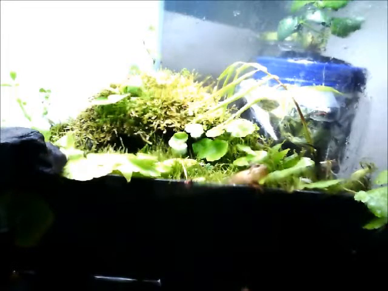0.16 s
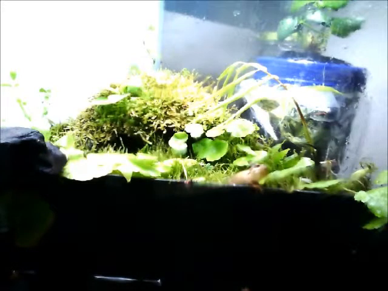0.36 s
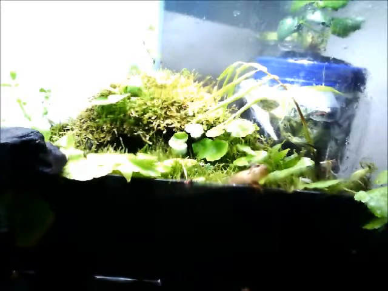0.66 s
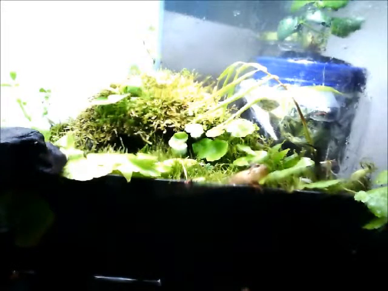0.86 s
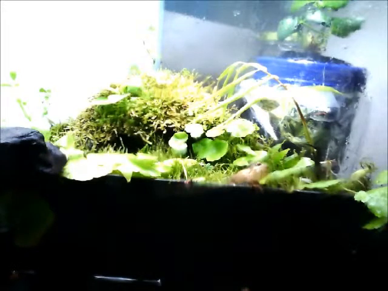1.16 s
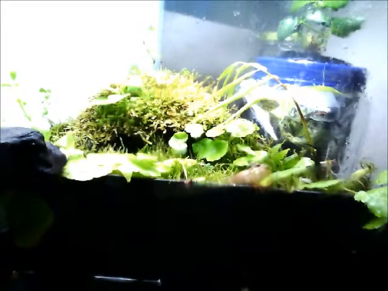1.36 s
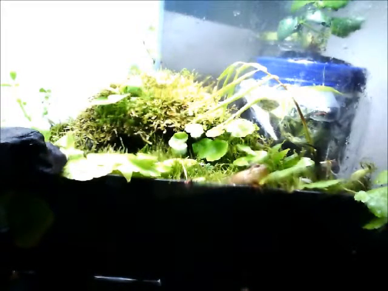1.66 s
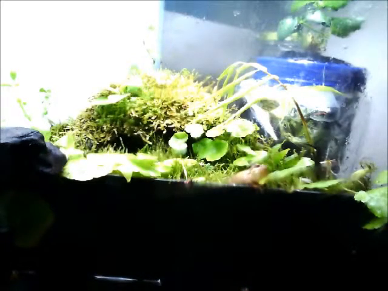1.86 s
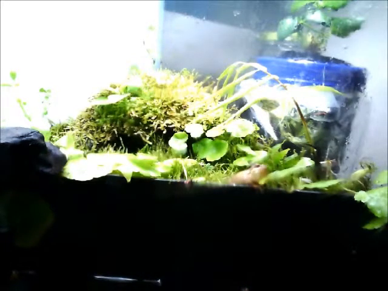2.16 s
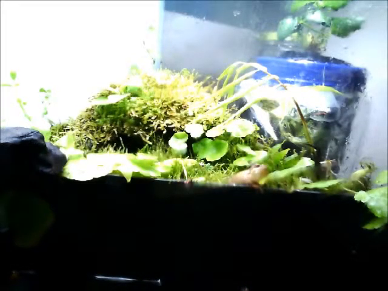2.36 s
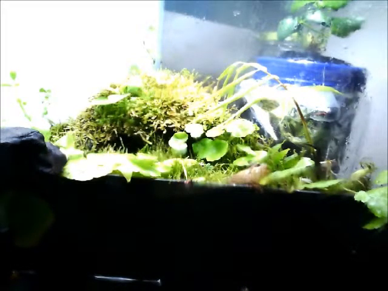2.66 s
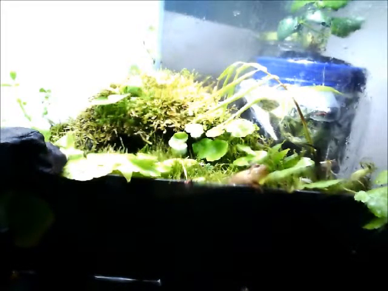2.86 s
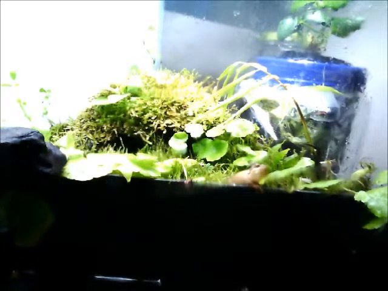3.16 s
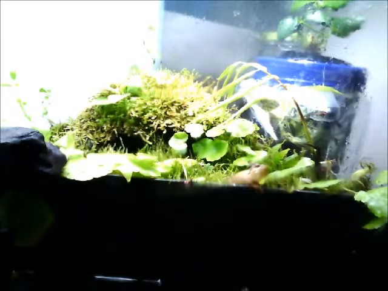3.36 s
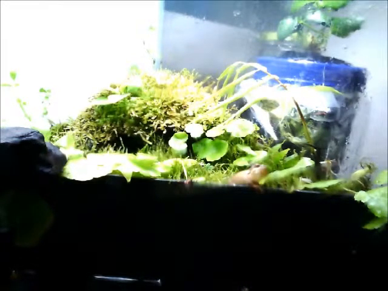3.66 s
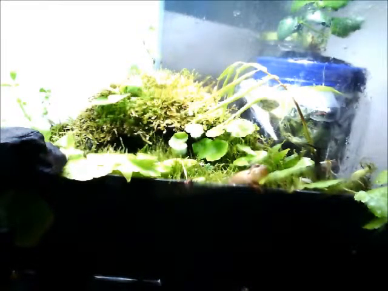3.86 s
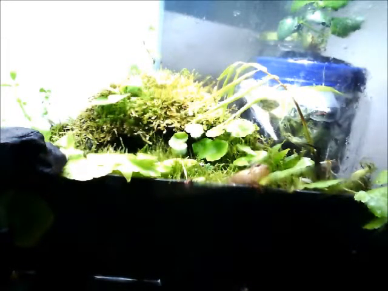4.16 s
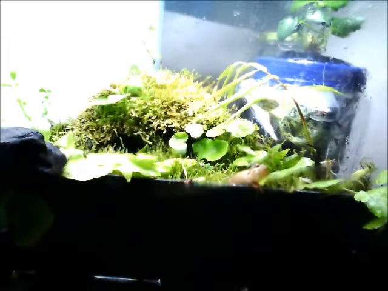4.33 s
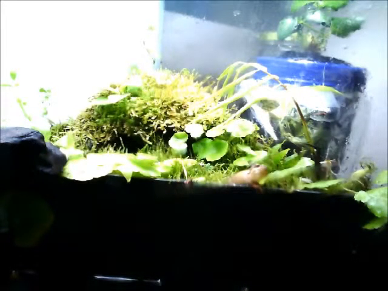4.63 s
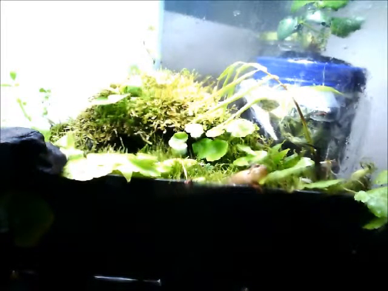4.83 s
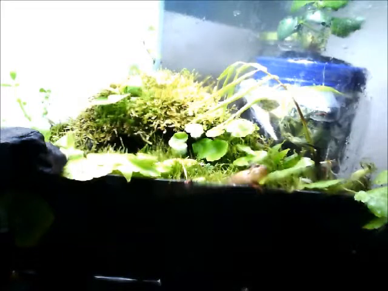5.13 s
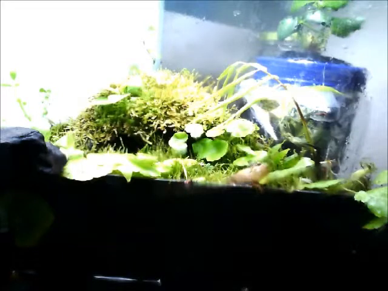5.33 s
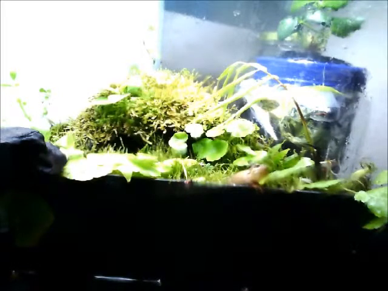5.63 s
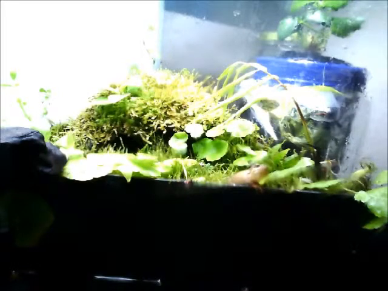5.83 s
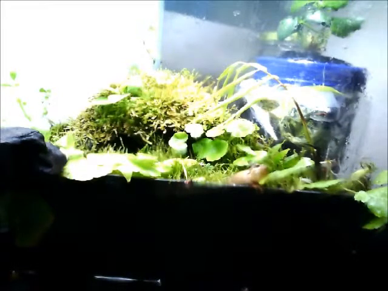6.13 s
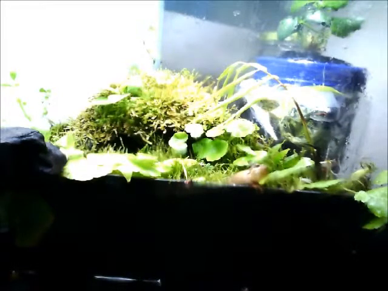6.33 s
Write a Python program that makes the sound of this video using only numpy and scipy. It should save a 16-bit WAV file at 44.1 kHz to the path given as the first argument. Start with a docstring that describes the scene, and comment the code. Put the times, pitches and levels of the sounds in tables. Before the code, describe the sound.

Indoors, a low mains and pump drone with soft hiss, while a tiny frog makes brisk creaky double calls that ring off glass.

```python
"""In a glass terrarium a small tree frog calls: most calls pair a swelling note with a harder one.
Each note is a quick train of pulses; every pulse excites a broad throat rasp and a round pip of the vocal sac.
The glass walls scatter the sound, standing waves ring in the tank and the room adds a short tail.
A pump and mains hum drone nearby as sums of sines, over rumble and soft hiss of filtered noise.
A few tiny drips are bursts of narrow-band noise, and dry clicks are single short impulses."""
import sys
import numpy as np
from scipy import signal
from scipy.fft import rfft, irfft, next_fast_len
from scipy.io import wavfile

SR = 44100
rng = np.random.default_rng(int(sys.argv[2]) if len(sys.argv) > 2 else 0)


def generate_wav(signal):
    """Clip the signal to [-1, 1] and save it as 16-bit WAV at the path in sys.argv[1]."""
    frames = np.transpose(np.atleast_2d(signal))
    scaled = np.clip(frames, -1, 1) * 32767
    pcm = np.round(scaled).astype(np.int16)
    wavfile.write(sys.argv[1], SR, pcm)


N = 286209

# Notes of the frog; an early crest is a hard start. Each row: start in seconds, length in seconds,
# crest in seconds after the start, pulse rate in pulses per second, rasp at the crest in relative dB,
# sac pip at the crest in relative dB, sac frequency at the crest in Hz.
FROG_NOTES = [ (-.047, .04, .03, 170, -9.5, -12, 3470), (1.161, .045, 0.034, 150, -8, -8, 3100),
              (1.2271, .036, 0, 150, -5, -6.5, 3260), (1.269, .062, .03, 166, -11, -15, 3540),
              (1.335, .067, 0.004, 150, -12, -15, 3520), (1.513, .032, 0, 166, -21.5, -33, 3160),
              (2.5955, .035, 0.012, 140, -7, -4.5, 3250), (2.672, .036, 0, 149, -5, -6.5, 3360),
              (4.1286, .036, 0.023, 148, -8.5, -8.5, 3130), (4.1977, .046, 0.0052, 157, -4, -6, 3385),
              (5.297, .049, 0.022, 147, -8.5, -8, 3220), (5.3698, .046, 0.0029, 141, -2, -4, 3410),
              (6.485, .04, .03, 190, -11, -7.5, 3350)]
# Spectrum of the rasp of one pulse. Each row: frequency in Hz, level in relative dB.
THROAT_SPECTRUM = [(700, -45.5), (1150, -18), (1400, -1.5), (1900, 0.5), (2300, -5), (2650, 5.5), (3350, 6),
                   (3950, -2.5), (4500, -4.5), (4950, -15.5), (6300, -13.5), (8000, -19), (9100, -19.5),
                   (10800, -47)]
# Standing waves between the glass walls. Each row: frequency in Hz, level in relative dB.
TANK_MODES = [(1377, 1), (1475, 1.5), (1615, -0.5), (1674, 7), (2160, -11), (2589, -0.5), (2850, -20),
              (2988, -5), (3085, -17), (3165, -7), (3233, -1.5), (3305, -21), (3374, 7.5), (3470, -3),
              (3662, -2.5), (3805, -4.5), (4293, 4.5), (4440, 1.5), (5776, -1), (6002, 8), (8400, 4)]
# Decay of the scatter from the glass. Each row: frequency in Hz, time to fall 60 dB in seconds.
GLASS_DECAY = [(1500, 0.14), (3200, 0.1), (6000, 0.33), (10000, 0.13)]
# Decay of the room tail. Each row: frequency in Hz, time to fall 60 dB in seconds.
ROOM_DECAY = [(1500, 0.62), (3500, 0.44), (6000, 0.95), (10000, 0.31)]
# Drips. Each row: start in seconds, level before the envelope in dB, centre in Hz,
# half-width at half amplitude in Hz.
DRIP_EVENTS = [(.222, -42, 5270, 450), (.815, -60, 11900, 400), (1.872, -48.5, 8800, 750),
               (2.438, -51.5, 9100, 500), (3.232, -52, 3480, 250), (4.745, -35.5, 5550, 850),
               (6.195, -54, 5030, 600), (6.24, -48, 6200, 890)]
# Dry clicks. Each row: start in seconds, gain on the click spectrum in dB.
CLICK_EVENTS = [(1.6534, -7), (2.774, -25), (3.187, -13.5), (3.883, -12)]
# Spectrum of one click before its gain. Each row: frequency in Hz, level in dB.
CLICK_SPECTRUM = [(200, 4), (1200, 9), (3000, -5), (8000, -8.5), (15000, -19)]
# Mains hum and its harmonics. Each row: frequency in Hz, level in dB rms.
MAINS_TONES = [(59.95, -32.5), (120, -43.5), (180, -46), (239.9, -53), (300, -57.5), (359.9, -53.5)]
# Tones of the pump. Each row: frequency in Hz, level in dB rms.
PUMP_TONES = [(15.7, -52), (31.4, -36.3), (78.4, -51), (93.1, -49.5), (182.7, -44)]
# Shape of the pump's rumble. Each row: frequency in Hz, density in relative dB.
RUMBLE_SPECTRUM = [(10, -5), (25, 0), (45, 3), (75, -1), (105, -7), (140, -5), (185, -6), (207, -15.5),
                   (255, -7), (330, -12), (450, -14), (700, -31)]
# Shape of the hiss. Each row: frequency in Hz, density in relative dB.
HISS_SPECTRUM = [(240, -11.5), (400, -6.5), (475, -2), (565, -6.5), (616, -4.5), (846, -5.5), (1110, -8),
                 (1340, -12), (1740, -11), (2460, -19.5), (6170, -21), (8350, -27), (11800, -34.5),
                 (12500, -33.5), (16200, -63), (22000, -120)]

HISS_TOP_HZ, TOP_HZ = 12400, 15900  # upper limits of the hiss and of the whole sound
LEAD = SR // 4  # samples of sound before time zero
RASP_SWELL_DB, PIP_SWELL_DB = 3, 17  # rise to the crest; less if the crest comes very early
RASP_SAG_DB_PER_S, PIP_SAG_DB_PER_S = 47, 149  # fall after the crest, as the breath runs out
TREBLE_DB, TREBLE_PER_HARSH_DB = -2.5, 0.8  # the further the rasp outweighs the pip, the more treble
EDGE_HZ, EDGE_HZ_PER_DB = 9140, 131  # top edge of a rasp at 0 dB; softer notes are duller
SAC_HZ_PER_DB, SAC_SCATTER_HZ = 18.5, 70  # pitch rises with effort and varies from pulse to pulse
LOW_DB, LOW_PER_DB = 4, 0.36  # low throat resonance of a rasp at 0 dB; it fades in softer notes


def frog(sac_echo_db=-4.5, level_db=12):
    """Source and enclosure: the pips sound directly and scattered, the rasps only scattered by the tank."""
    track, walls = np.zeros(LEAD + N), terrarium()
    for start, length, crest, rate, rasp_db, pip_db, sac_hz in FROG_NOTES:
        at, size_db = larynx(length, rate)
        rasp_effort_db = size_db + effort(at / SR, crest, RASP_SWELL_DB, RASP_SAG_DB_PER_S)
        pip_effort_db = size_db + effort(at / SR, crest, PIP_SWELL_DB, PIP_SAG_DB_PER_S)
        pulses = np.bincount(at, amp(rasp_db + rasp_effort_db))
        rasps = signal.fftconvolve(pulses, throat(rasp_db, pip_db))
        pips = amp(pip_db) * sac(at, pip_effort_db, sac_hz)
        add(track, start, pips)
        add(track, start, signal.fftconvolve(rasps + amp(sac_echo_db) * pips, walls))
    return amp(level_db) * track[LEAD:]


def larynx(length, rate, jitter=.045, scatter_db=0.56):
    """Quasi-periodic excitation: sample positions and sizes (dB) of the slightly uneven pulses of a note."""
    chance = rng.standard_normal((64, 2))[:int(length * rate) + 1]
    # jitter is a fraction of the pulse period
    times = np.abs(np.arange(len(chance)) + jitter * chance[:, 0]) / rate
    return np.round(times * SR).astype(int), scatter_db * chance[:, 1]


def effort(t, crest, swell_db, sag_db_per_s, quickest_s=.012):
    """Exponential growth and decay: the level (dB) rises evenly to 0 at the crest, then sags steadily."""
    swell = swell_db * (t - crest) / max(crest, quickest_s)
    sag = sag_db_per_s * (crest - t)
    return np.where(t < crest, swell, sag)


def throat(rasp_db, pip_db, low_hz=1550, low_width_hz=220, treble_hz=6200, treble_width_hz=1100):
    """Source-filter principle: the rasp of one pulse, with energy 1, is coloured by how hard the note is."""
    low_db = LOW_DB + LOW_PER_DB * rasp_db
    treble_db = TREBLE_DB + TREBLE_PER_HARSH_DB * (rasp_db - pip_db)
    edge_hz = EDGE_HZ + EDGE_HZ_PER_DB * rasp_db

    def bump(hz, centre, width):
        return np.exp(-((hz - centre) / width) ** 2 / 2)

    def colour(hz):
        low = low_db * bump(hz, low_hz, low_width_hz)
        treble = treble_db * bump(hz, treble_hz, treble_width_hz)
        edge = -10 * np.log10(1.5 + (hz / edge_hz) ** 20)
        return along(THROAT_SPECTRUM, hz) + low + treble + edge

    rasp = impulse(colour)[:SR // 50]
    return rasp / np.linalg.norm(rasp)


def sac(at, effort_db, sac_hz, swell=0.00064):
    """Damped resonance: at each pulse the sac takes a few cycles to swell and a few to die."""
    t = np.arange(SR // 50) / SR
    scatter_hz = SAC_SCATTER_HZ * rng.standard_normal(size=64)[:len(at)]
    hz = sac_hz + SAC_HZ_PER_DB * effort_db + scatter_hz
    pips = t ** 2 * np.exp(-t / swell) * np.sin(2 * np.pi * hz[:, None] * t)
    pips *= (amp(effort_db) / np.linalg.norm(pips, axis=1))[:, None]
    # overlapping pips add where their samples coincide
    positions = at[:, None] + np.arange(len(t))
    return np.bincount(positions.ravel(), pips.ravel())


def terrarium(modes_db=-14, modes_t60=0.12, room_db=-11):
    """Impulse response of an enclosure: quick scatter, standing waves in the tank, then the room."""
    t = np.arange(SR // 3) / SR
    modes = sum(amp(db) * np.sin(2 * np.pi * (hz * t + rng.random())) for hz, db in TANK_MODES)
    modes *= amp(-60 * t / modes_t60)
    answer = tail(GLASS_DECAY, onset=0.00073) + amp(room_db) * tail(ROOM_DECAY, onset=0.0042)
    answer[:len(t)] += amp(modes_db) * modes / np.linalg.norm(modes)
    return answer


def tail(decay, onset):
    """Diffuse reverberation: noise echoes scaled to energy 1, each frequency dying at its own speed."""
    hz, t, z = signal.stft(rng.standard_normal(SR // 2), SR, nperseg=256)
    t60 = along(decay, hz)[:, None]
    echoes = signal.istft(z * amp(-60 * t / t60), SR, nperseg=256)[1]
    echoes *= 1 - np.exp(-np.arange(len(echoes)) / SR / onset)
    return echoes[:SR // 2] / np.linalg.norm(echoes)


def drips(t60=0.21, attack=0.0038):
    """Narrow-band decay: tiny high plinks of resonant noise, each with a quick attack and a steady fade."""
    track, t = np.zeros(LEAD + N), np.arange(SR // 3) / SR
    for start, db, centre_hz, width_hz in DRIP_EVENTS:
        noise = rng.standard_normal(len(t))
        ring = unit(filtered(noise, lambda hz: 1 / (1 + ((hz - centre_hz) / width_hz) ** 2)))
        add(track, start, ring * amp(db - 60 * t / t60) * (1 - np.exp(-t / attack)))
    return track[LEAD:]


def clicks():
    """Impulsive excitation: single short coloured impulses with no echo."""
    track, click = np.zeros(LEAD + N), impulse(lambda hz: along(CLICK_SPECTRUM, hz))
    for start, db in CLICK_EVENTS:
        add(track, start, amp(db) * click)
    return track[LEAD:]


def hum():
    """Superposition: steady mains and pump tones add, and two close ones beat against each other."""
    t = np.arange(N) / SR
    tones = MAINS_TONES + PUMP_TONES
    # the root of two turns an rms level into a sine's peak
    return sum(np.sqrt(2) * amp(db) * np.sin(2 * np.pi * (hz * t + rng.random())) for hz, db in tones)


def air(rumble_db=-36, hiss_db=-45.0):
    """Stationary random noise: filtering shapes the pump's low rumble and an even hiss, levels in dB rms."""
    def rumble_response(hz):
        rolloff_db = 71 * np.log10(1 + (hz / 1500) ** 2)
        return amp(along(RUMBLE_SPECTRUM, hz) - rolloff_db)

    def hiss_response(hz):
        return amp(along(HISS_SPECTRUM, hz)) * (hz < HISS_TOP_HZ)

    rumble = filtered(rng.standard_normal(N), rumble_response)
    hiss = filtered(rng.standard_normal(N), hiss_response)
    return amp(rumble_db) * unit(rumble) + amp(hiss_db) * unit(hiss)


def amp(db):
    """Logarithmic level: decibels to amplitude gain."""
    return 10 ** (np.asarray(db) / 20)


def unit(x):
    """Mean power: scale a signal to rms 1."""
    return x / np.sqrt(np.mean(x ** 2) + 1e-20)


def along(points, hz):
    """Logarithmic frequency: interpolate (Hz, value) points on a log axis."""
    f, v = np.transpose(points)
    return np.interp(np.log(hz + 1), np.log(f + 1), v)


def filtered(x, response):
    """Linear filtering: multiply the spectrum of x by a response of frequency."""
    m = next_fast_len(len(x) + SR // 4)
    return irfft(rfft(x, m) * response(np.fft.rfftfreq(m, 1 / SR)), m)[:len(x)]


def impulse(colour, size=2048):
    """Minimum phase: the causal ring that has the given dB spectrum, found by folding its cepstrum."""
    cepstrum = irfft(np.log(amp(colour(np.fft.rfftfreq(size, 1 / SR))) + 1e-6))
    cepstrum[1:size // 2] *= 2
    cepstrum[size // 2 + 1:] = 0
    return irfft(np.exp(rfft(cepstrum)))


def add(track, start, sound):
    """Superposition: mix a sound into a track that begins LEAD samples early."""
    part = track[LEAD + round(start * SR):][:len(sound)]
    part += sound[:len(part)]


def scene():
    """Superposition: frog, drips, clicks, hum and air sum at one microphone."""
    return (frog() + drips() + clicks() + hum() + air())[None]


def record(dry):
    """Band limitation: the recorder keeps nothing above its limit and has a small constant offset."""
    offset = -.017  # of full scale
    return filtered(dry[0], lambda hz: hz < TOP_HZ)[None] + offset


dry = scene()
out = record(dry)
generate_wav(out)
```